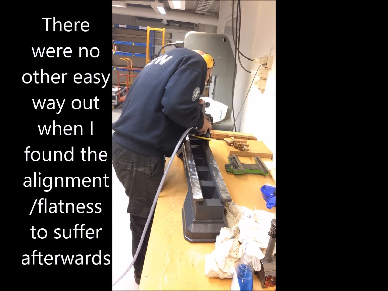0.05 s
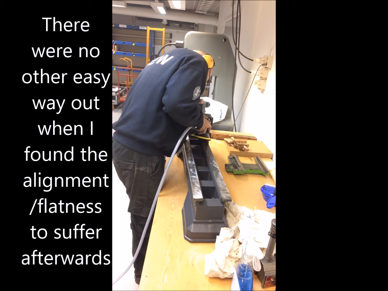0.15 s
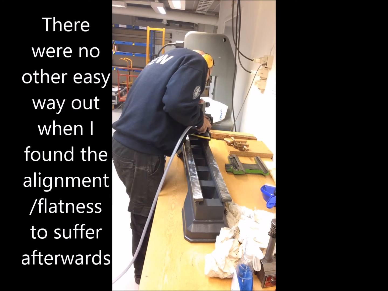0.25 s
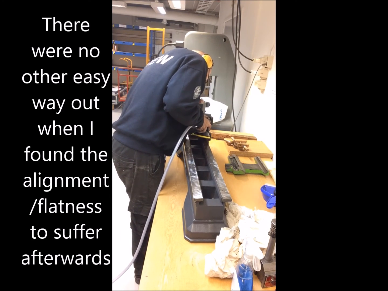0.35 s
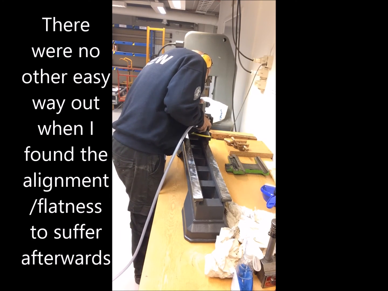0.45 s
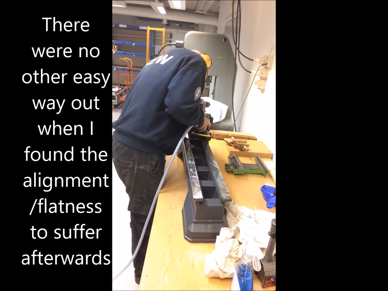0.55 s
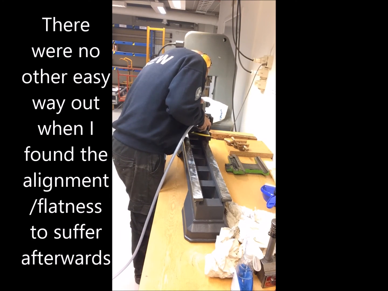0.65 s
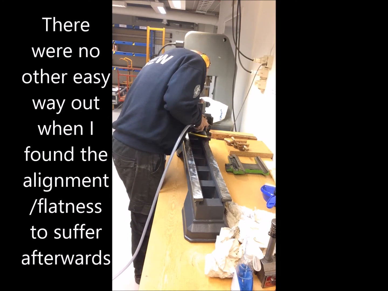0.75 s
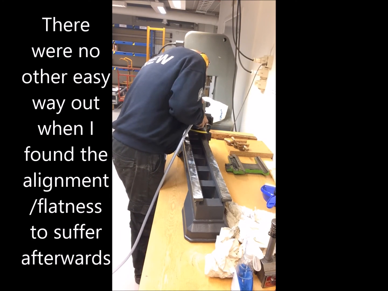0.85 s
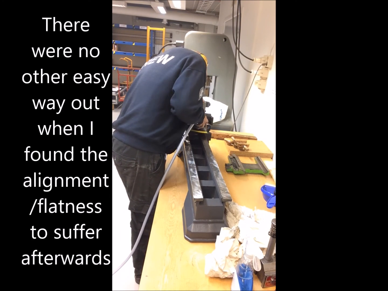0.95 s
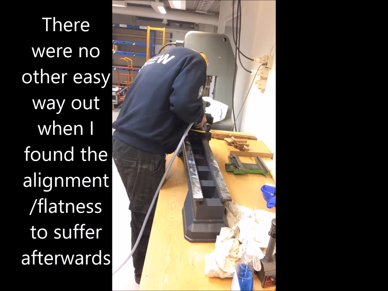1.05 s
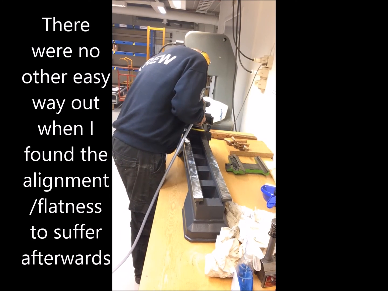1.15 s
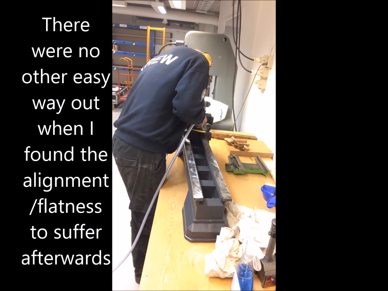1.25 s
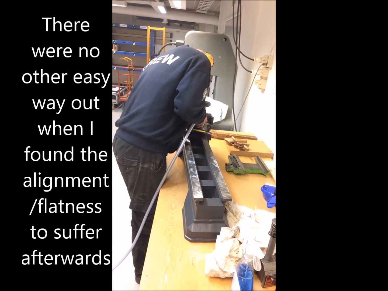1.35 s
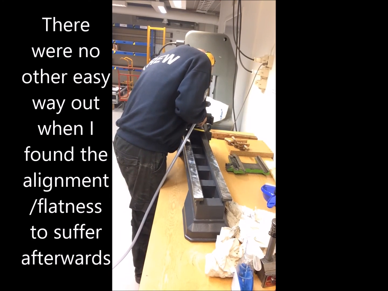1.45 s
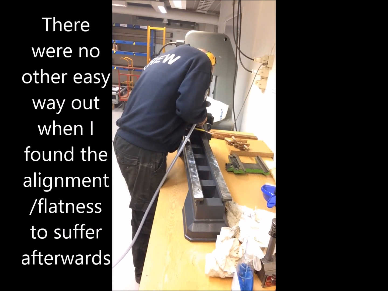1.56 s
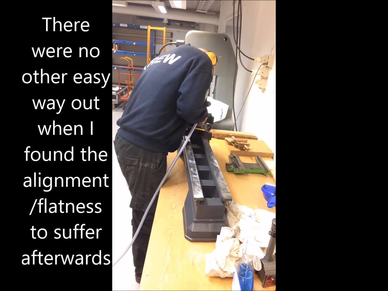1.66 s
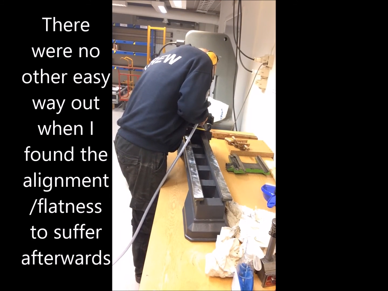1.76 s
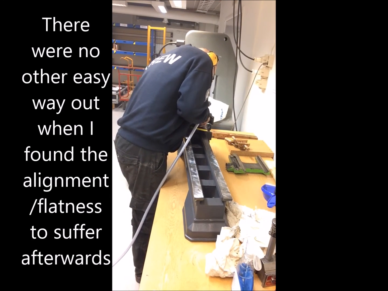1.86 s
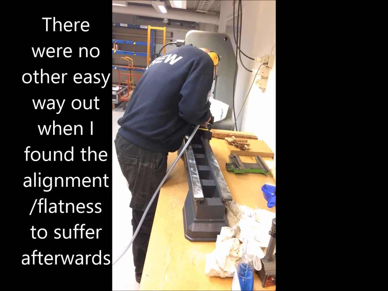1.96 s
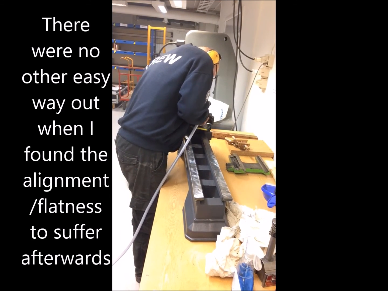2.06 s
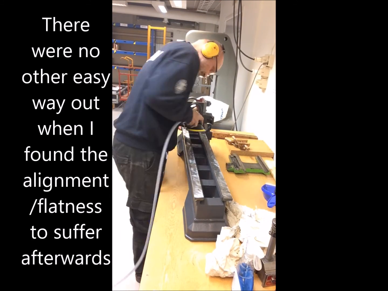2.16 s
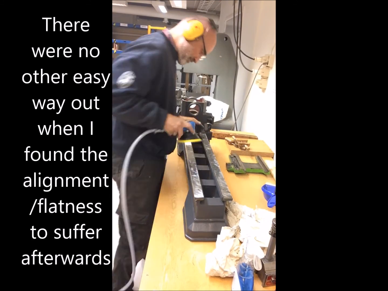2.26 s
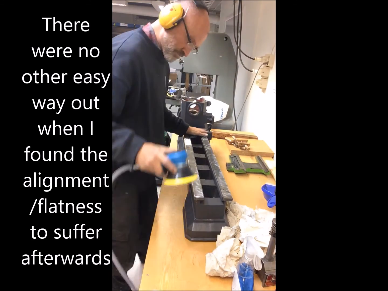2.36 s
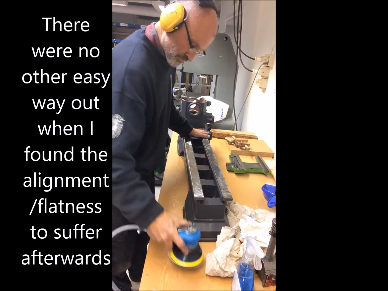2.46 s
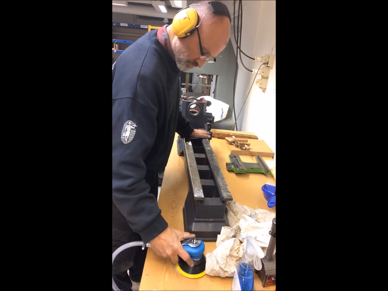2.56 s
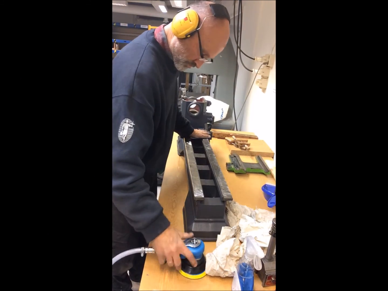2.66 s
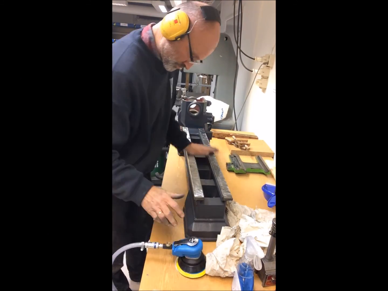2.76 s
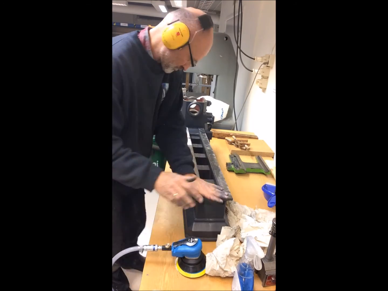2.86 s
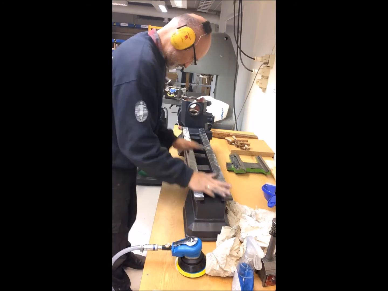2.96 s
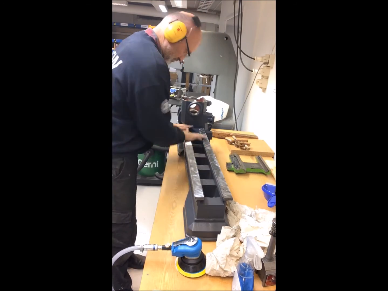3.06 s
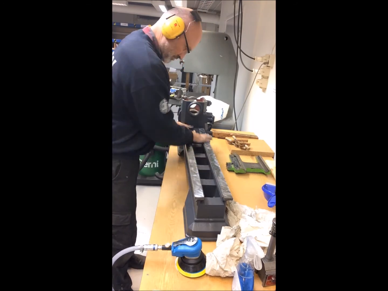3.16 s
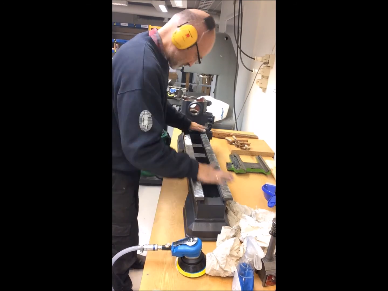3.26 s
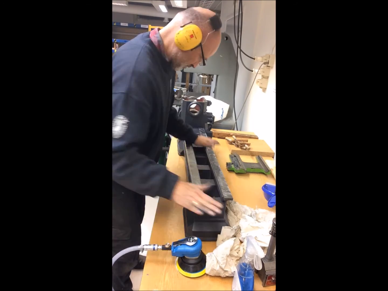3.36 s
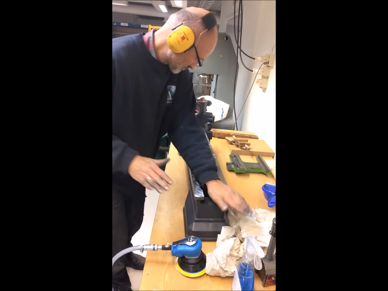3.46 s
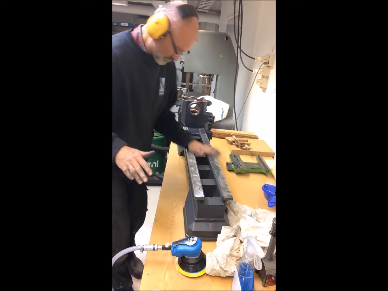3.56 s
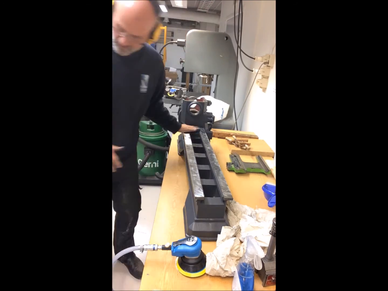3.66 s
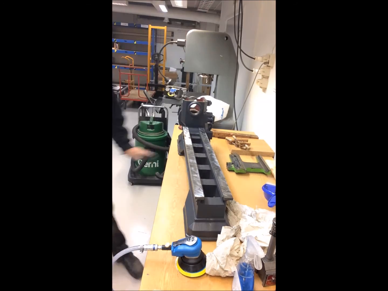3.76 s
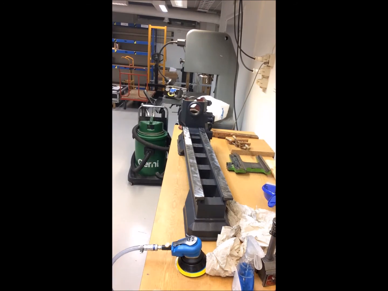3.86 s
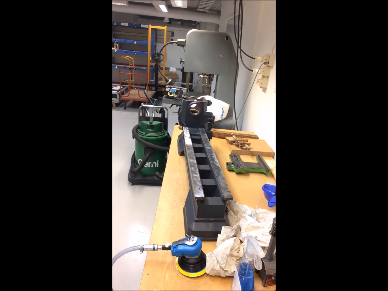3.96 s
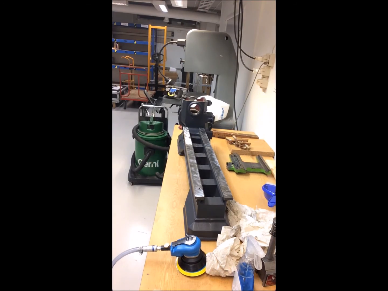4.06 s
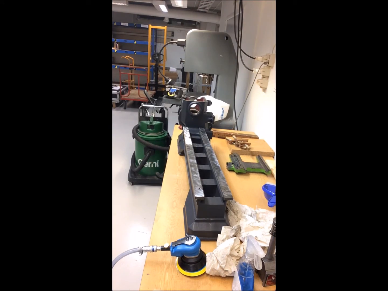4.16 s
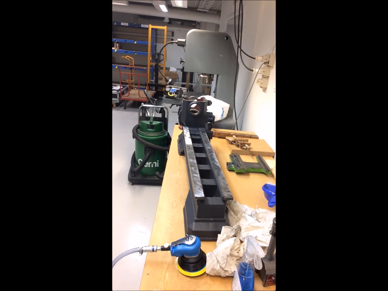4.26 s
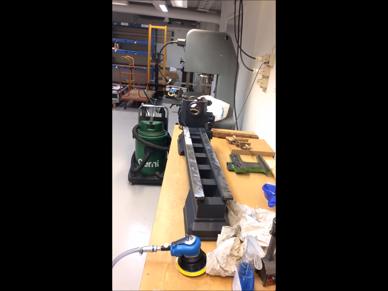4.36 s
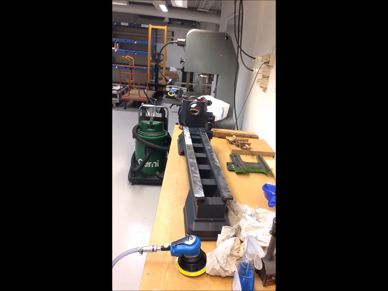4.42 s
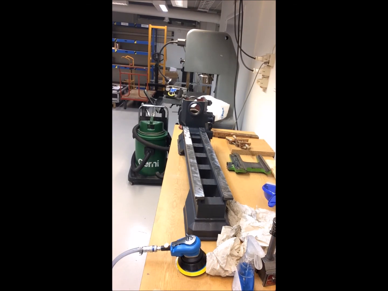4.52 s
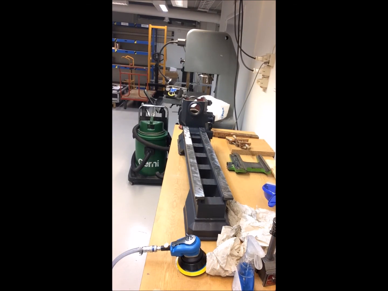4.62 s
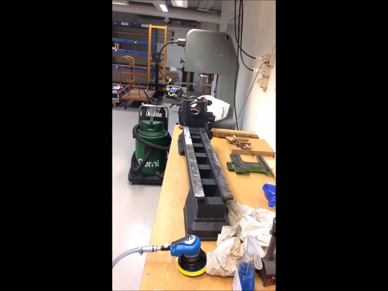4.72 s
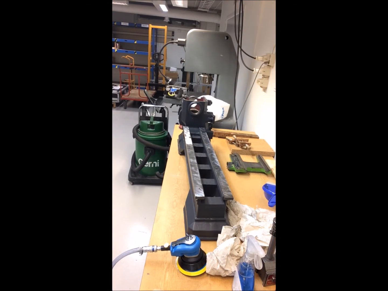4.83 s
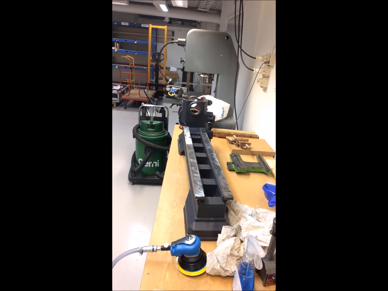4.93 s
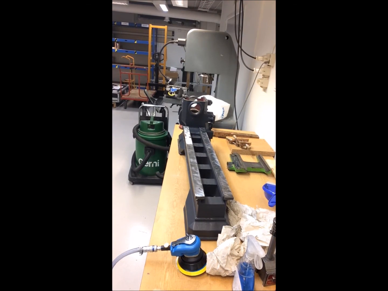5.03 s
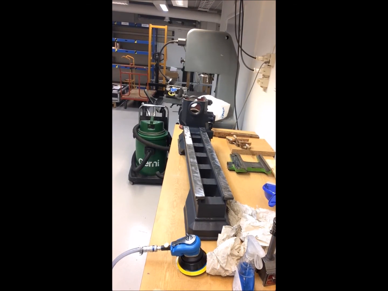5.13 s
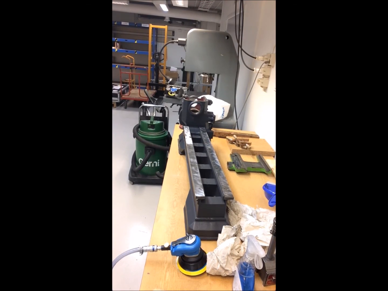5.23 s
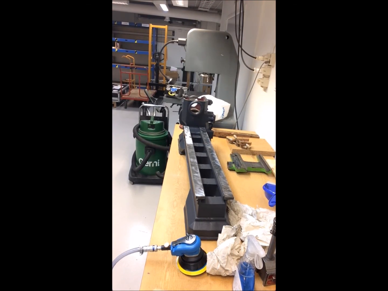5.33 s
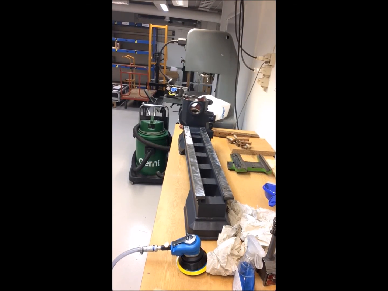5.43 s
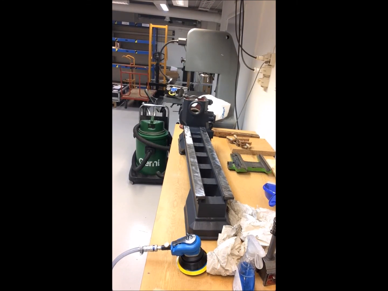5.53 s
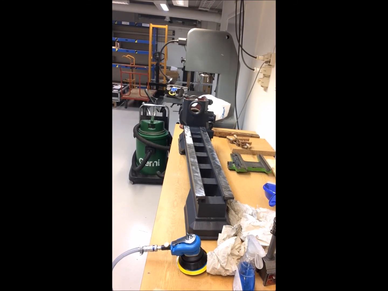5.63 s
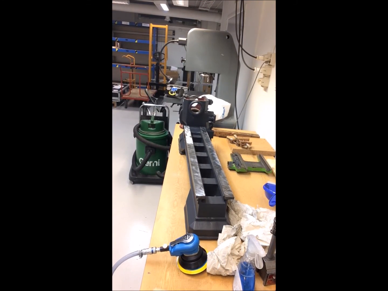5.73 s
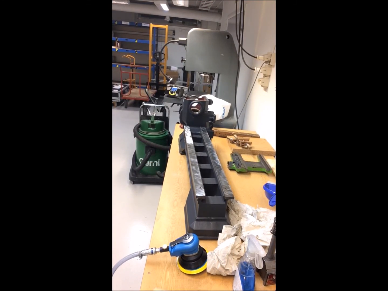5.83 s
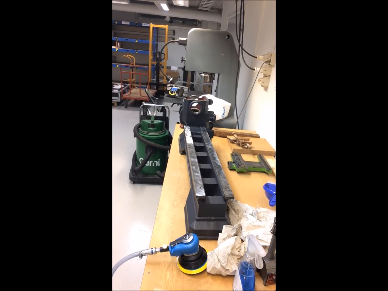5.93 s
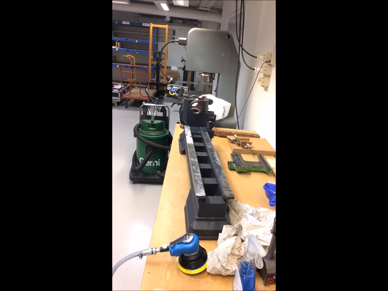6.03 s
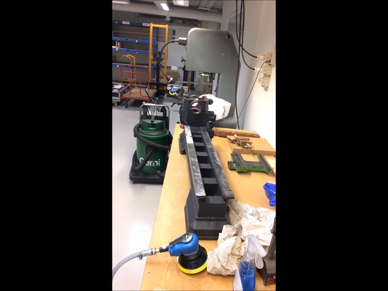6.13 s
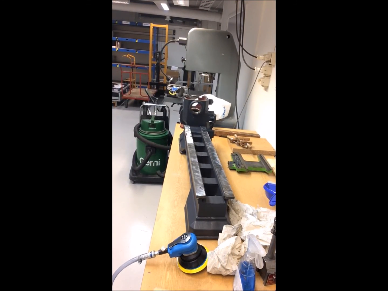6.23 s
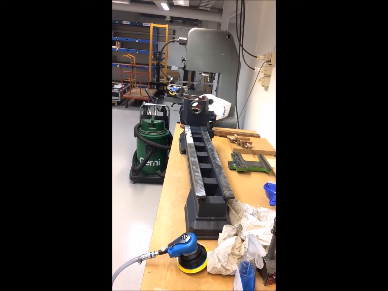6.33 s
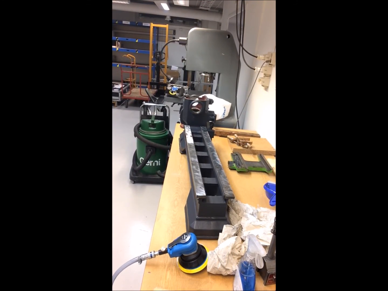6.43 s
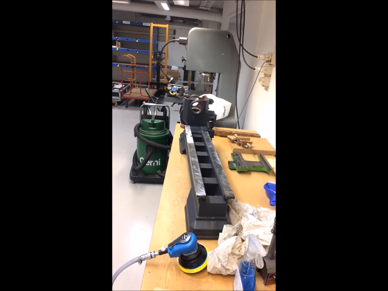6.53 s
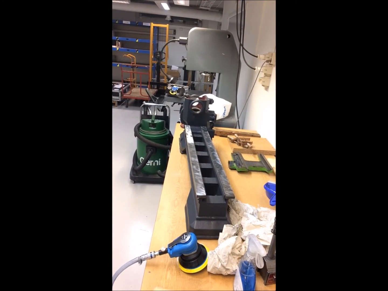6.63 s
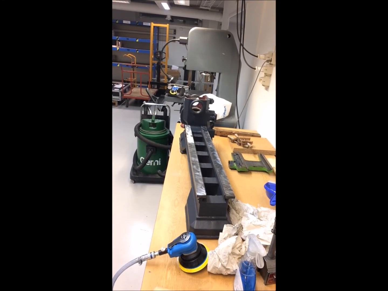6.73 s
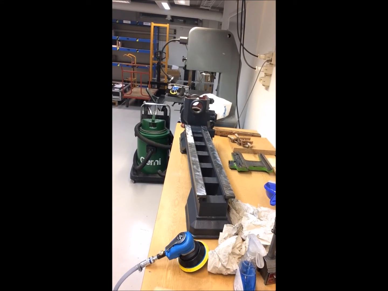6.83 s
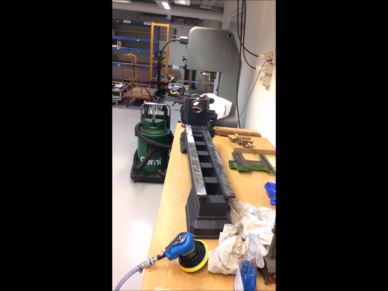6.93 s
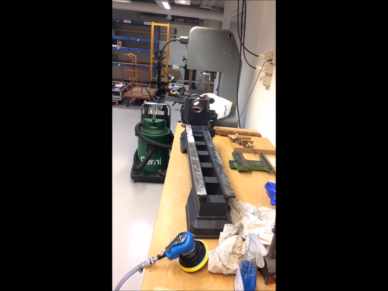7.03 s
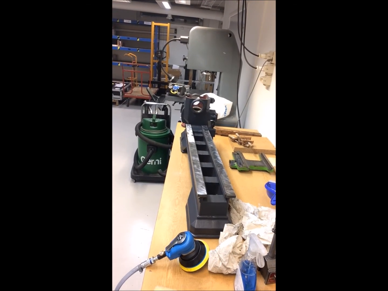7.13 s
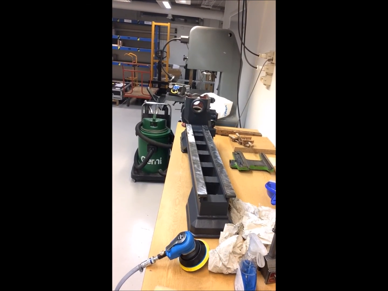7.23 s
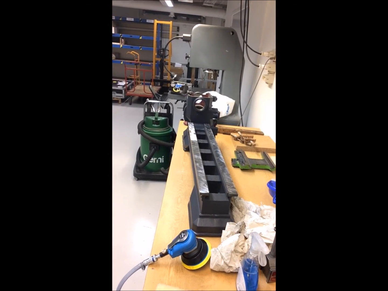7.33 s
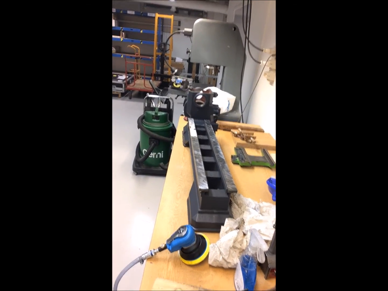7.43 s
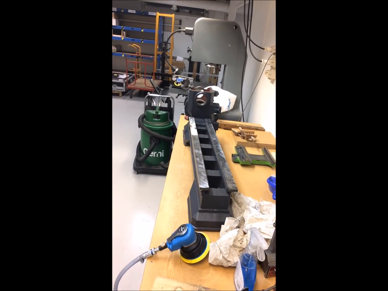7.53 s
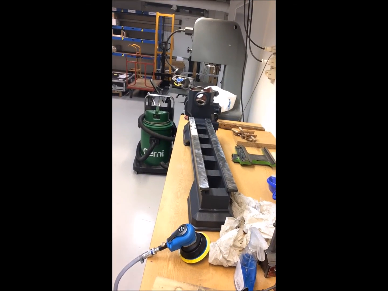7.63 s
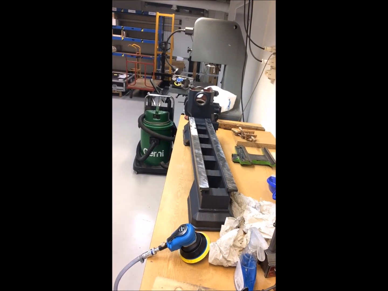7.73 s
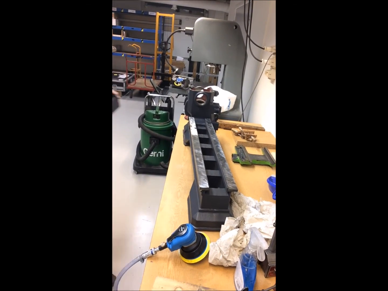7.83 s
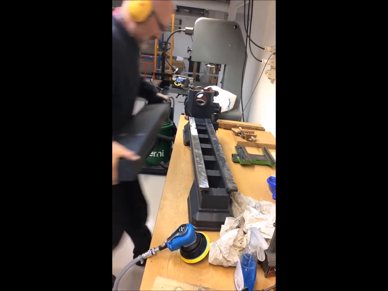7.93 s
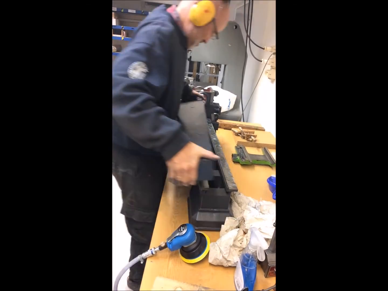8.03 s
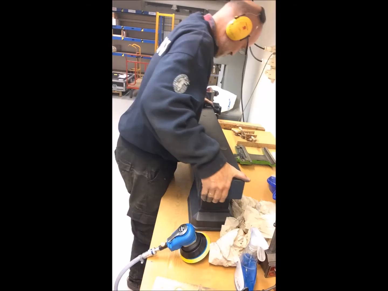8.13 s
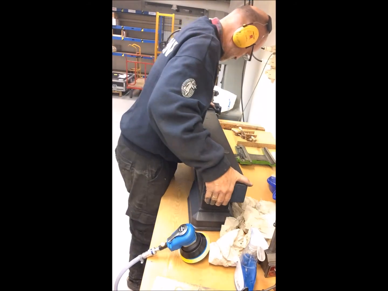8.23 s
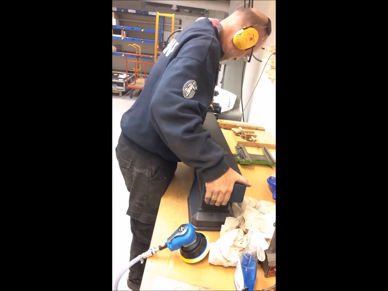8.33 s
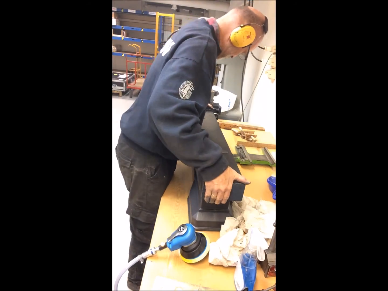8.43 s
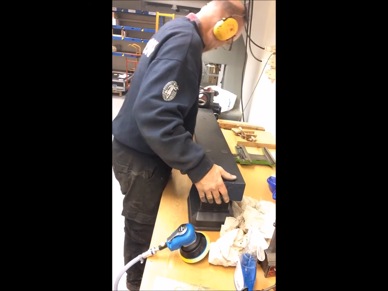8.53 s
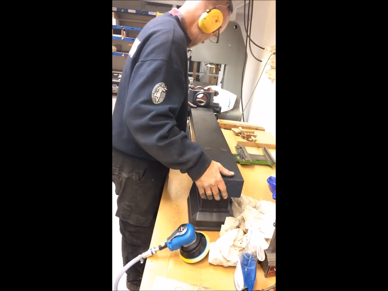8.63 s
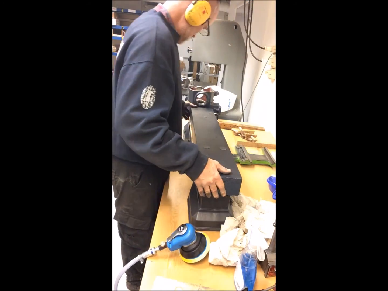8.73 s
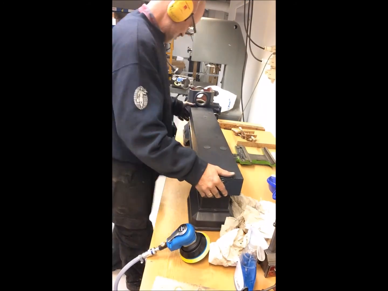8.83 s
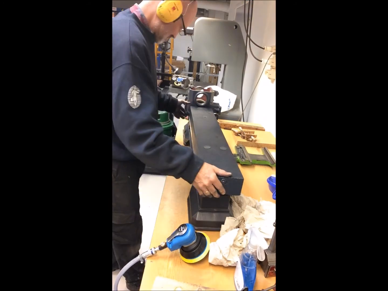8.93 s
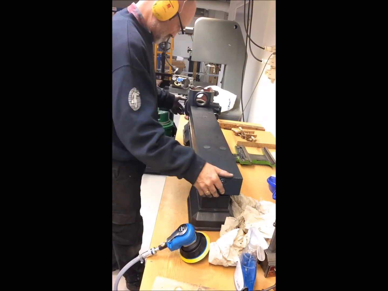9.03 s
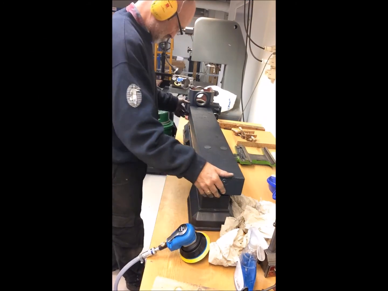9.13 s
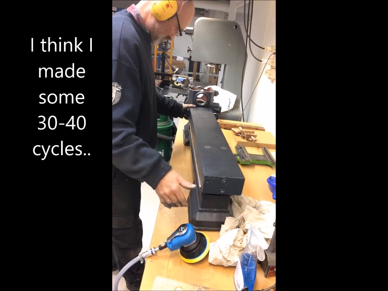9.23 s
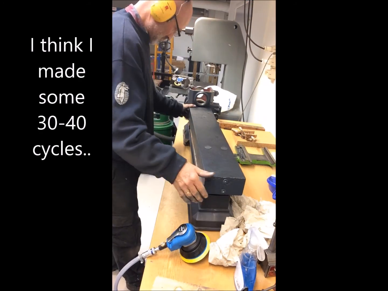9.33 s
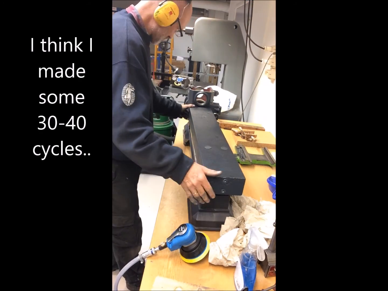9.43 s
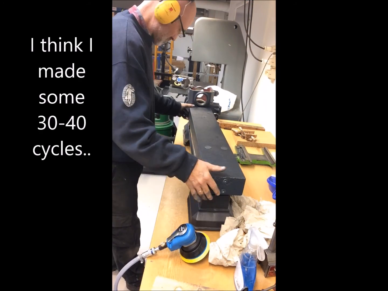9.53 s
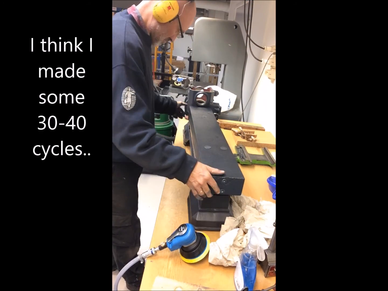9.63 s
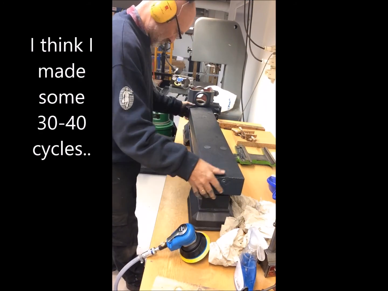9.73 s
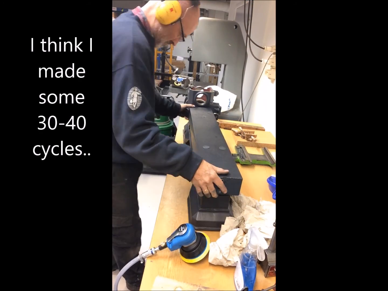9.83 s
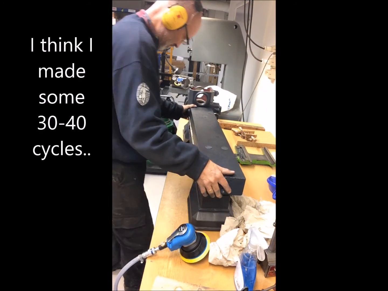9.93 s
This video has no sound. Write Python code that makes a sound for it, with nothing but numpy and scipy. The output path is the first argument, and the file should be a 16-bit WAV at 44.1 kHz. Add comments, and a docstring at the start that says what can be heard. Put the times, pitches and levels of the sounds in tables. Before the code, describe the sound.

From the start, an air sander grinds on an iron bed, a high whine over a gritty hiss, its pitch dipping with each quick stroke. At about 2.2 seconds it is released and falls rapidly in pitch, ending with a knock near 2.6. A quiet workshop hum remains. From 3 to 7 seconds a faint, high hiss throbs unevenly, joined from about 4 by light ticks and tiny squeaks of small metal parts. A sharper ringing clink comes at 6.5. Between 7.2 and 7.8, metal scrapes and bangs in a quick cluster, with the loudest hit near 7.4, followed by a few lighter knocks. At 8.4 a heavy slab lands on the bed with a solid clack. It slides with a soft hiss from 8.6, then judders quietly until nearly 10 seconds, with one more knock at 9.3. A single microphone hears everything.

```python
"""Air sander and slab on a cast-iron bed

An air-driven sander whines at its vane rate over the hiss of grit, is released and runs down,
its pulses falling through the fixed resonances of the exhaust. Over the hum of the workshop a
treble hiss throbs, small parts tick, and metal scrapes and bangs, ringing in its modes. Last, a
heavy slab is set on the bed and slid along it, juddering by stick-slip friction. One microphone."""
import sys
import numpy as np
from scipy import signal
from scipy.io import wavfile
from scipy.ndimage import uniform_filter1d

SR = 44100
rng = np.random.default_rng(int(sys.argv[2]) if len(sys.argv) > 2 else 0)


def to_wav(sig):
    """Store sig (one row per channel, or 1-D mono) as 16-bit WAV at the path in sys.argv[1].

    Samples outside -1..1 are clipped; the rate is SR.
    """
    pcm = np.clip(np.atleast_2d(sig), -1, 1) * 32767
    pcm = np.round(pcm).astype(np.int16)
    wavfile.write(sys.argv[1], SR, pcm.T)  # frames by channels


N = 440118
TIME = np.arange(N) / SR

# Noise spectra: (frequency [Hz], relative density [dB])
SHOP_SPECTRUM = [(12, -75), (20, -37.5), (138, -28), (187, -12), (337, -4.5), (388, -4.5), (527, -11),
                 (678, -7), (949, -15.5), (1330, -9.5), (1910, -13.5), (14700, -31.5), (16000, -26.5)]
BRIGHT_THROB_SPECTRUM = [(300, -52), (1500, -61), (3200, -2.5), (6000, 1), (10000, -2), (16000, -3.5)]
DULL_THROB_SPECTRUM = [(300, -29), (1500, -8.5), (3500, 2), (6000, -2), (16000, -22.5)]
SCRAPE_SPECTRUM = [(88, -56.5), (150, -29.5), (280, -38), (422, -44), (790, -29), (1260, -19), (1790, -3.5),
                   (3490, -3.5), (16000, -28)]
BANG_SPECTRUM = [(12, -55.5), (20, -32), (300, -30), (434, -20), (607, -2.5), (1120, -11.5), (1530, -3.5),
                 (3250, -4), (6180, -13), (8180, -14.5), (16000, -30.5)]
AIR_SPECTRUM = [(100, -24), (400, -10), (1500, -5), (3000, -16), (5800, -15), (7500, -6), (10500, -3),
                (16000, -13)]
GRIT_SPECTRUM = [(24, -74), (40, -65), (180, -15.5), (372, -4.5), (433, -5.5), (585, -11.5), (770, -11.5),
                 (1090, -14), (1810, -3.5), (2770, -8), (3700, -7), (4340, -4), (5050, 0), (6170, -6.5),
                 (8200, -4), (10000, -4.5), (12500, -5.5), (14800, -2), (16000, -4.5)]
# Mains-driven hum: (frequency [Hz], level [dB])
HUM_PARTIALS = [(193.8, -77), (387.6, -67), (484.5, -75.5), (678.3, -68.5), (1061, -77.5), (1206, -81),
                (1303, -73.5), (1351, -76.5), (2993, -82), (3187, -83)]
# A low tone that swells and sags: (time [s], frequency [Hz], level [dB])
DRONE_CURVE = [(5.9, 217.6, -72.5), (7.014, 196.8, -64), (7.3, 190, -66)]
# Even runs of throbs in the hiss: (first time [s], last time [s], count, level [dB])
THROB_RUNS = [(2.902, 3.087, 4, -69), (3.235, 3.235, 1, -54), (3.44, 3.7, 3, -62), (3.932, 3.932, 1, -55),
              (4.099, 4.099, 1, -64), (4.269, 4.333, 2, -57), (4.422, 5.033, 11, -58),
              (5.068, 5.068, 1, -62), (5.126, 5.25, 3, -61), (5.332, 5.625, 5, -56.5),
              (5.372, 5.372, 1, -62), (5.76, 5.76, 1, -59), (5.968, 6.246, 5, -55), (6.344, 6.415, 2, -59),
              (6.547, 6.547, 1, -50), (6.723, 6.723, 1, -61), (6.854, 6.969, 3, -61),
              (7.976, 8.064, 2, -64)]
# Weight of the bright spectrum in that hiss: (time [s], share [0-1])
BRIGHT_SHARE = [(2.7, 1), (4.1, 0.5), (6.2, 0.55), (6.5, 0.9), (9, 0.42)]
# Envelopes of the steady hiss, the slab's rubbing and its judder: (time [s], level [dB])
RUSTLE_LEVEL = [(2.7, -78), (3.25, -68), (3.85, -70), (4, -85), (4.3, -71), (4.95, -72), (5.3, -67),
                (5.65, -78), (6.3, -72), (6.6, -70), (7.1, -80)]
SLIDE_LEVEL = [(8.63, -68), (8.655, -57), (8.7, -59.5), (8.82, -68), (9.3, -69.5), (9.98, -72)]
JUDDER_LEVEL = [(8.9, -60), (8.96, -54), (9.1, -52), (9.22, -53), (9.29, -60), (9.38, -51), (9.55, -49),
                (9.64, -64), (9.72, -54), (9.79, -56)]
# Squeaks and pings: (time [s], length [s], start pitch [Hz], end pitch [Hz], level [dB])
SQUEAK_EVENTS = [(4.13, .022, 3700, 3550, -62), (4.182, .035, 3450, 3150, -60),
                 (4.255, .04, 3600, 3150, -62), (4.305, .035, 3300, 3000, -62), (4.4, .04, 3300, 3050, -63),
                 (5.535, .04, 7450, 7200, -62), (6.479, .02, 3750, 3700, -40)]
# Ticks and knocks: (time [s], level [dB], ring [Hz], middle re ring [dB], treble re ring [dB])
IMPACTS = [(2.396, -32, 2200, -14, -24), (2.621, -21, 411, -9, -21), (2.635, -26, 600, -22, -32),
           (2.652, -30, 330, -26, -36), (3.814, -41, 2830, -2, -21), (3.917, -32, 940, -2, -10.5),
           (4.156, -34.5, 3640, -9.5, -15), (4.181, -34.5, 3400, -10, -7), (4.222, -27, 1030, -20, -28),
           (4.255, -32, 3380, -17, -4.5), (4.587, -36.5, 3170, -2, -18), (4.71, -35.5, 3260, -4.5, -21),
           (4.762, -38.5, 3320, -7, -23), (4.836, -34, 3100, -5, -25), (4.942, -44.5, 401, 3, -19),
           (5.228, -48, 5000, -2, -3), (5.364, -47, 5800, -2, -3), (5.632, -45, 4500, -4, -8),
           (5.726, -42, 5300, -5, -9), (5.764, -36, 4040, -6, -6), (5.812, -43.5, 2900, 0.5, 0),
           (5.832, -35, 5000, -8, -14), (5.872, -37, 5600, -6, -12), (5.916, -45, 5500, -8, -14),
           (5.956, -26, 870, -8, -28), (6.48, -21, 3620, -12, -9), (6.503, -17.5, 3190, 1.5, -14),
           (6.504, -24, 700, -20, -20), (6.334, -46, 678, -4, -3), (6.532, -37, 2400, 7, -27),
           (6.542, -33, 2470, 1, -34), (6.704, -28.5, 1020, -16.5, -39), (6.854, -30.5, 1120, -29, -27),
           (6.906, -36.5, 910, -7, -4), (6.926, -35, 666, -5, -15), (7.152, -29.5, 1150, -17, -28),
           (7.253, -13, 1020, -21, -45), (7.26, -6.5, 2470, -7.5, -33), (7.381, -3, 520, -25, -40),
           (7.468, -33, 1700, -9, -30), (7.487, -34, 4600, 3.5, -2), (7.5, -35, 3430, 4, -12),
           (7.511, -23.5, 960, -8, -24), (7.569, -30.5, 1650, -10, -15), (7.582, -25.5, 4400, -8, -14),
           (7.607, -19, 1150, 2, -10), (7.613, -12.5, 1200, -9, -26), (7.754, -19, 690, -15, -22),
           (7.905, -44, 673, -4, -14), (7.977, -24, 1030, -18, -32), (8.003, -33.5, 1510, -14, -27),
           (8.053, -33, 4200, -2, -9), (8.195, -34.5, 1580, -6.5, -14), (8.32, -44, 1400, -4, -10),
           (9.291, -25.5, 1320, -29, -36)]
# Metal dragged or shaken:
# (time [s], rise [s], hold [s], fade [dB/s], level [dB], relative ring [dB], roughness [dB])
SCRAPE_EVENTS = [(7.266, .02, .012, -500, -31, 1.5, 2.5), (7.3, .018, .02, -450, -29, -1, 2.5)]
BANG_EVENT = (7.3805, .0015, .019, -780, -12.5, -4, 4.0)
SCUFF_EVENT = (7.738, .022, .004, -330, -46, -5, .3)
# Normal modes: (frequency [Hz], relative level [dB], T60 [s])
METAL_MODES = [(890, -19, 0.11), (1535, -6, 0.07), (1760, -4, .07), (2150, -5, 0.2), (2410, -8, .1),
               (2545, -7, 0.16), (3250, -4, 0.07), (3550, -8, .13), (3870, -8, 0.2), (4400, -7, .1),
               (4820, -10, 0.09), (5500, -7, 0.1), (6480, -16, 0.2), (7540, -17, 0.11), (8350, -15, .15)]
SLAB_MODES = [(258, -14, .08), (748, -11, .08), (1195, -9, .035), (1507, -12, .03), (2046, 0, .028),
              (2363, -8, .025), (3790, -21, .025), (5180, -15, .03), (7200, -24, .025)]
# Resonances driven by friction: (frequency [Hz], bandwidth [Hz], relative level [dB])
JUDDER_RESONANCES = [(780, 55, -5.5), (427, 160, -9), (579, 87, -11.5), (1510, 200, -12), (1080, 140, -15)]
BED_RESONANCES = [(3000, 120, -1), (3960, 130, -4), (4480, 110, 0), (5250, 140, -2), (7390, 120, -4),
                  (9080, 150, -7)]
GRIT_RESONANCES = [(7900, 600, -42), (11300, 300, -48), (13900, 320, -45), (14800, 270, -42.5)]
# The motor with its air cut off: (time [s], vane rate [Hz])
RUNDOWN_RATE = [(2.183, 2022), (2.2, 1950), (2.216, 1617), (2.246, 1340), (2.276, 1156), (2.316, 992),
                (2.388, 772), (2.454, 620), (2.504, 540), (2.63, 347)]
# Response of the exhaust: (frequency [Hz], gain [dB])
EXHAUST_RESPONSE = [(300, -14), (800, -7), (1150, -3), (1350, 8), (1700, 9), (2100, -3), (2600, -9),
                    (4000, -11), (5500, -8), (6600, -4), (7800, 10), (8700, -3), (10500, -2), (12500, -14),
                    (16000, -45)]
# The motor under load: (time [s], free vane rate [Hz], full drag [Hz], hand strokes done [count])
SANDING_CURVE = [(0, 2130, 150, -.4), (.04, 2150, 160, 0), (.15, 2200, 100, 1), (.237, 2160, 120, 2),
                 (.387, 2170, 140, 4), (.567, 2190, 150, 6), (.7, 2190, 50, 7), (.86, 2200, 70, 9),
                 (.99, 2260, 40, 10), (1.07, 2250, 115, 11), (1.17, 2290, 10, 12), (1.3, 2320, 10, 13),
                 (1.5, 2230, 60, 15), (1.72, 2210, 75, 17), (1.81, 2190, 80, 18), (1.965, 2220, 120, 19),
                 (2.08, 2240, 120, 20), (2.19, 2260, 60, 20.8)]
# Shaft tone and vane harmonics 1 to 4: (level at USUAL_HZ [dB], slope with vane rate [dB/100 Hz])
WHINE_PARTIALS = [(-49, 5.5), (-42.5, -1.2), (-43.5, 1), (-41.5, 3.2), (-41.5, 3)]

VANES, USUAL_HZ = 5, 2200
SQUEAL_HZ = [3550, 4800, 5050, 5300, 5550, 5900, 7800, 8300]  # the bed whistles under the grit
BAND_LIMIT_HZ = 15780
NO_BASS = signal.butter(2, 220, "high", fs=SR, output="sos")  # small stiff things move no deep bass
NO_RUMBLE = signal.butter(2, 70, "high", fs=SR, output="sos")  # grit makes no rumble


def amp(db):
    """Amplitude ratio of a level in decibels."""
    return 10 ** (np.asarray(db) / 20)


def unit_rms(x):
    """Normalisation to rms 1."""
    return x / np.sqrt(np.mean(x ** 2) + 1e-20)


def add(mix, start_s, sound):
    """Superposition: a sound sums into the mix from start_s on."""
    part = mix[round(start_s * SR):][:len(sound)]
    part += sound[:len(part)]


def level_at(spectrum, hz):
    """Interpolation of a spectrum on a logarithmic frequency axis."""
    freqs, levels = np.transpose(spectrum)
    return np.interp(np.log(hz + 1), np.log(freqs + 1), levels)


def curves(rows):
    """Linear interpolation in time: the start time, and each other column sample by sample."""
    times, *columns = np.transpose(rows)
    t = np.arange(times[0], times[-1], 1 / SR)
    return times[0], [np.interp(t, times, column) for column in columns]


def drift(n, span_s):
    """Random fluctuation of rms 1: noise smoothed over span_s."""
    width = int(span_s * SR) + 1
    return unit_rms(uniform_filter1d(uniform_filter1d(rng.standard_normal(n), width), width))


def hiss(spectrum, n, patchy_db):
    """Spectral shaping of noise, with patches of level that wander in time and frequency."""
    hz = np.fft.rfftfreq(512, 1 / SR)
    real, imag, patches = rng.standard_normal((n // 128 + 5, 257, 3)).T
    patches = unit_rms(uniform_filter1d(uniform_filter1d(patches, 6, 0), 12, 1))
    frames = (real + 1j * imag) * amp(level_at(spectrum, hz)[:, None] + patchy_db * patches)
    return unit_rms(signal.istft(frames, nperseg=512, noverlap=384)[1][:n])


def resonate(drive, hz, width_hz):
    """Forced response of one resonance, scaled to rms 1: shift down, smooth, shift back."""
    carrier = np.exp(2j * np.pi * hz * np.arange(len(drive)) / SR)
    pole = np.exp(-np.pi * width_hz / SR)
    return unit_rms((carrier * signal.lfilter([1 - pole], [1, -pole], drive / carrier)).real)


def ring(modes):
    """Impulse response of a body: a sum of damped normal modes."""
    t = TIME[:6000]
    return sum(amp(db - 60 * t / t60) * np.sin(2 * np.pi * hz * t) for hz, db, t60 in modes)


def shop():
    """Superposition of a broadband floor, the line spectrum of mains-driven hum and a sagging drone."""
    out = amp(-63 + .9 * drift(N, .035)) * hiss(SHOP_SPECTRUM, N, patchy_db=1)
    for hz, db in HUM_PARTIALS:
        waver_db = .87 * np.resize(drift(N // 4, .05), N)
        out += np.sqrt(2) * amp(db + waver_db) * np.sin(2 * np.pi * (hz * TIME + rng.random()))
    start_s, (hz, db) = curves(DRONE_CURVE)
    add(out, start_s, np.sqrt(2) * amp(db) * np.sin(2 * np.pi * np.cumsum(hz) / SR))
    return out


def treble_hiss():
    """Amplitude modulation of noise: a hiss throbs, rings faintly, and swells as the slab rubs."""
    envelope = amp(np.interp(TIME, *np.transpose(SLIDE_LEVEL), left=-200))
    throb = np.exp(-abs((TIME[:4410] - .05) / .021) ** 3)
    for first_s, last_s, count, db in THROB_RUNS:
        for centre_s in np.linspace(first_s, last_s, round(count)):
            late, loud = rng.standard_normal(2)
            add(envelope, centre_s - .05 + .003 * late, amp(db + 1.5 * loud) * throb)
    envelope += amp(np.interp(TIME, *np.transpose(RUSTLE_LEVEL), left=-200, right=-200))
    crackle = amp(2.3 * drift(N, .00063))
    share = np.clip(np.interp(TIME, *np.transpose(BRIGHT_SHARE)) + .13 * drift(N, .025), 0, 1)
    noise = share * hiss(BRIGHT_THROB_SPECTRUM, N, patchy_db=2.2)
    noise += (1 - share) * hiss(DULL_THROB_SPECTRUM, N, patchy_db=2.8)
    faint_ring = amp(-13 + 6 * drift(N, .025)) * resonate(rng.standard_normal(N), hz=3150, width_hz=200)
    faint_ring *= np.interp(TIME, [4, 4.2, 6.4, 6.7], [0, 1, 1, 0])
    return envelope * crackle * noise + uniform_filter1d(envelope, 6000) * faint_ring


def squeak(start_s, length_s, from_hz, to_hz, db):
    """Random frequency and amplitude modulation roughen a short falling whistle."""
    n = round(length_s * SR)
    hz = np.linspace(from_hz, to_hz, n) * (1 + .02 * drift(n, .0015))
    envelope = amp(db + 3.5 * drift(n, .003)) * signal.windows.tukey(n, .4)
    return start_s, envelope * np.sin(2 * np.pi * np.cumsum(hz) / SR)


def knock(start_s, db, hz, middle_db, treble_db, t60=None):
    """Impact transient: a crack, then noise and a ring at hz that decay exponentially."""
    n = 5000
    t = TIME[:n]
    spectrum = [(100, middle_db - 36), (600, middle_db - 8), (3500, middle_db),
                (9000, treble_db - 3.5), (16000, treble_db - 5)]
    noise = np.hypot(amp(middle_db), amp(treble_db)) * hiss(spectrum, n, patchy_db=1)
    hump = resonate(resonate(rng.standard_normal(n), hz, .7 * hz), hz, .7 * hz)
    ringing = .75 * (np.sin(2 * np.pi * hz * t) + hump) * np.minimum(t / .002, 1)
    crack = 2.6 * np.exp(-t / .003)
    t60 = max(t60 or .11 + .0015 * db, .01)  # by default, softer knocks die sooner
    tail = amp(-60 * t / t60)
    sound = (noise * (tail + crack) + ringing * tail) * np.minimum(t * SR / 8, 1)
    return start_s, amp(db - 15.5) * signal.sosfilt(NO_BASS, sound)


def clatter(event, spectrum):
    """Forced vibration: rough noise drives a metal body's modes, under a hiss that dulls as it fades."""
    start_s, rise_s, hold_s, fade_db_per_s, db, ring_db, rough_db = event
    n = 6000
    t = TIME[:n]
    faded_db = fade_db_per_s * np.maximum(t - rise_s - hold_s, 0)
    roughness = amp(rough_db * drift(n, .0006))
    drive = rng.standard_normal(n) * roughness
    body = unit_rms(signal.fftconvolve(drive, ring(METAL_MODES))[:n])
    dull_spectrum = [(hz, level - 4 * np.log2(hz / 1000 + 1)) for hz, level in spectrum]
    bright = np.clip(1 + faded_db / 35, 0, 1)  # wholly dull once 35 dB down
    noise = bright * hiss(spectrum, n, patchy_db=1) + (1 - bright) * hiss(dull_spectrum, n, patchy_db=1.5)
    envelope = np.minimum(t / rise_s, 1) * amp(db + faded_db)
    return start_s, envelope * signal.sosfilt(NO_BASS, noise * roughness + amp(ring_db) * body)


def slab_landing(start_s):
    """Impact excitation: a rough double blow, 11 ms apart, rings the modes of the slab."""
    t = TIME[:1500]
    blow = rng.standard_normal(len(t)) * (np.exp(-t / .002) + .28 * np.exp(-abs(t - .011) / .002))
    body = signal.fftconvolve(blow, ring(SLAB_MODES))
    body = signal.sosfilt(np.vstack([NO_BASS, NO_BASS]), body)
    body *= amp(-8.5) / abs(body).max()
    add(body, *knock(0, db=-21, hz=736, middle_db=-4, treble_db=-14, t60=.17))
    return start_s, body


def slab_judder(first_slip_s=8.913, slips_per_s=27.2):
    """Stick-slip friction: each slip of the slab swells a steady, resonant rubbing noise."""
    start = round(JUDDER_LEVEL[0][0] * SR) - 2000
    envelope = np.full(N - start, amp(-62.5))
    for slip_s in np.arange(first_slip_s, JUDDER_LEVEL[-1][0], 1 / slips_per_s):
        late, loud = rng.standard_normal(2)
        db = np.interp(slip_s, *np.transpose(JUDDER_LEVEL)) + 1.6 * loud
        add(envelope, slip_s - start / SR - .004 + .003 * late, amp(db) * signal.windows.hann(1000))
    friction = rng.standard_normal(len(envelope))
    body = sum(amp(db) * resonate(resonate(friction, hz, width), hz, 2 * width)
               for hz, width, db in JUDDER_RESONANCES)
    return start / SR, envelope * body


def singing_bed():
    """Sliding friction under the slab drives the narrow resonances of the bed."""
    envelope = amp(np.interp(TIME, *np.transpose(SLIDE_LEVEL), left=-200) - 12.5 + 3 * drift(N, .025))
    friction = rng.standard_normal(N)
    return envelope * sum(amp(db) * resonate(friction, hz, width) for hz, width, db in BED_RESONANCES)


def sander_rundown(db_per_octave=10.5, air_db_per_s=-25):
    """Source and filter: vane pulses slow behind fixed exhaust resonances as the air hiss fades."""
    start_s, (hz,) = curves(RUNDOWN_RATE)
    n = len(hz)
    t = TIME[:n]
    phase = 2 * np.pi * np.cumsum(hz) / SR
    pulses = np.zeros(n)
    for k in range(1, 30):  # vane harmonics
        db = level_at(EXHAUST_RESPONSE, k * hz) - .85 * k - 80 * (k * hz > BAND_LIMIT_HZ)
        pulses += amp(db + 4 * drift(n, .008)) * np.cos(k * phase + k * k)
    for k in range(2, 40):  # uneven vanes add weak shaft orders
        db = level_at(EXHAUST_RESPONSE, k * hz / VANES) - 26
        pulses += amp(db + 5 * drift(n, .01)) * np.cos(k * phase / VANES + k * k)
    reflections = .036 * rng.standard_normal(2000) * amp(-60 * TIME[:2000] / .067)
    pulses += signal.fftconvolve(pulses, reflections)[:n]  # near walls make the overtones uneven
    pulses /= np.sqrt(uniform_filter1d(pulses ** 2, 1500))  # flattened, so that speed sets the level
    pulses *= amp(-25 + db_per_octave * np.log2(hz / hz[0])) * np.minimum(t / .016, 1)
    air = amp(-40 + air_db_per_s * t) * hiss(AIR_SPECTRUM, n, patchy_db=1)
    return start_s, (pulses + air) * signal.windows.tukey(n, .03)


def sanding(recovery_share=.68, grit_db_per_100_hz=.9):
    """Frequency modulation by load: each hand stroke drags the vane tones down and swells the grit."""
    start_s, (free_hz, full_drag_hz, strokes) = curves(SANDING_CURVE)
    drag_hz = full_drag_hz * np.interp(strokes % 1, [0, recovery_share, 1], [1, 0, 1])
    hz = free_hz - drag_hz
    n = len(hz)
    phase = 2 * np.pi * np.cumsum(hz * (1 + .0045 * drift(n, .00645))) / SR
    whine = np.zeros(n)
    for k, (usual_db, slope) in zip((1 / VANES, 1, 2, 3, 4), WHINE_PARTIALS):
        db = usual_db + slope * (hz - USUAL_HZ) / 100
        whine += np.sqrt(2) * amp(db + 1.75 * np.sqrt(k + 1) * drift(n, .014)) * np.sin(k * phase)
    shaft_orders = sum(amp(-64 + 2.4 * drift(n, .0078)) * np.sin(k * phase / VANES + k * k)
                       for k in range(2, 24))
    grains = amp(1.26 * drift(n, .00045) + .8 * drift(n, .06))  # uneven grit roughens the hiss
    grit = hiss(GRIT_SPECTRUM, n, patchy_db=1.6)
    grit *= amp(-30 + grit_db_per_100_hz * drag_hz / 100) * grains
    grit = signal.sosfilt(NO_RUMBLE, grit)
    rings = sum(amp(db) * resonate(rng.standard_normal(n), f, width) for f, width, db in GRIT_RESONANCES)
    squeals = sum(amp(-53.5 + 5 * drift(n, .012)) * resonate(rng.standard_normal(n), f, width_hz=70)
                  for f in SQUEAL_HZ)
    release = np.clip((TIME[n] - TIME[:n]) / .016, 0, 1)
    return start_s, (whine + shaft_orders + grit + rings + squeals) * release


def scene():
    """Superposition of all sources at one microphone, on two identical channels."""
    mix = shop() + treble_hiss()
    add(mix, *slab_landing(start_s=8.405))
    add(mix, *slab_judder())
    mix += singing_bed()
    add(mix, *sanding())
    add(mix, *sander_rundown())
    for event in SCRAPE_EVENTS:
        add(mix, *clatter(event, SCRAPE_SPECTRUM))
    add(mix, *clatter(BANG_EVENT, BANG_SPECTRUM))
    add(mix, *clatter(SCUFF_EVENT, SCRAPE_SPECTRUM))
    for event in IMPACTS:
        add(mix, *knock(*event))
    for event in SQUEAK_EVENTS:
        add(mix, *squeak(*event))
    return np.array([mix, mix])


def record(dry):
    """Band limiting and saturation: the microphone loses deep bass, rounds peaks and cuts top treble."""
    thinned = signal.sosfilt(signal.butter(1, 80, "high", fs=SR, output="sos"), dry)
    lowpass = signal.firwin(1023, BAND_LIMIT_HZ, window=("kaiser", 10), fs=SR)
    return signal.oaconvolve(np.tanh(thinned), lowpass[None], "same")


dry = scene()
out = record(dry)
to_wav(out)
```